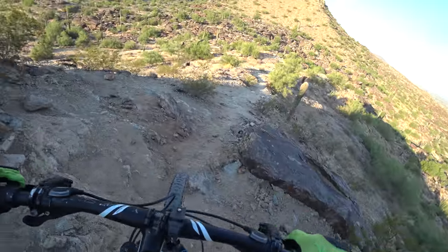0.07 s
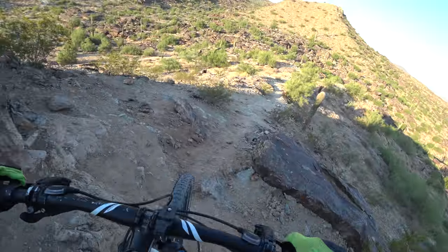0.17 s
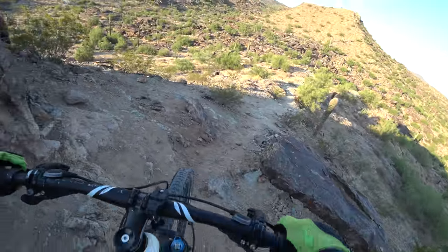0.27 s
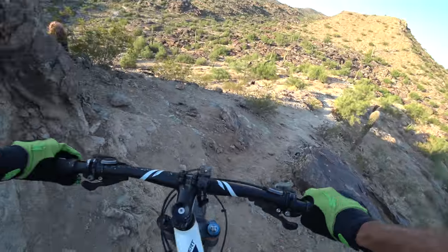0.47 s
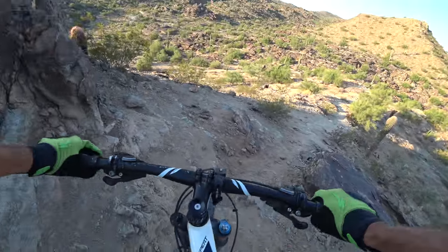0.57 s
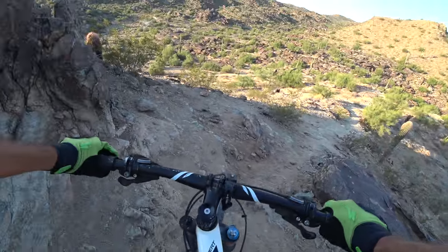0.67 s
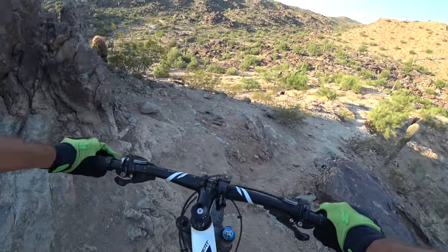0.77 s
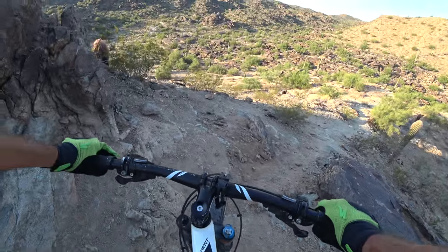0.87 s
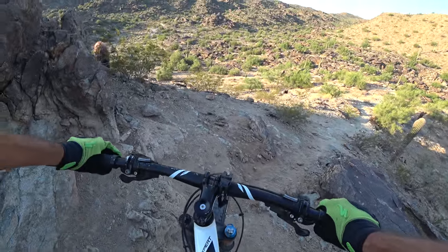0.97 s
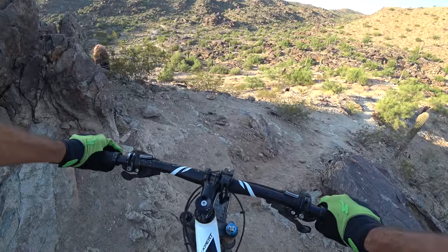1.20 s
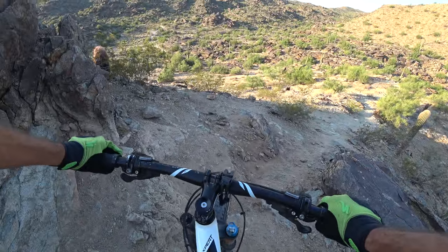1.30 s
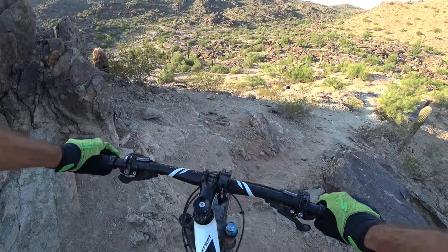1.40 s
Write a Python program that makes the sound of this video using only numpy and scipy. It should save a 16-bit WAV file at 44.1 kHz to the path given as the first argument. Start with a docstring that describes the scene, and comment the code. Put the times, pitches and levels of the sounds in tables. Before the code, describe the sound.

A mountain bike rolls slowly over crunching grit and snapping stones, heard close from the rider's chest. At about 0.2 seconds a tyre thumps onto rock and buzzes briefly. More knocks come around 0.6 seconds. From 0.7 seconds the freehub ratchets with metallic clicks, slowing and fading until about 1.4 seconds, while a hollow tyre drone and low wind rumble die down.

```python
"""Grit crunches and stones snap under a mountain bike rolling slowly down a rocky trail.
Heard from the rider's chest, a tyre lands on rock and booms, its knobs buzz, the frame knocks
and the chain ticks. Then the rider coasts: the freehub's pawls ratchet ever more slowly,
ringing hub and wheel, while the hollow drone of the tyres and the wind's rumble die down."""
import sys
import numpy as np
from scipy import signal
from scipy.fft import rfft, irfft, next_fast_len
from scipy.io import wavfile

SR = 44100
rng = np.random.default_rng(int(sys.argv[2]) if len(sys.argv) > 2 else 0)


def waveform_to_disk(signal):
    """Save audio, clipped to [-1, 1], as 16-bit WAV at the path in sys.argv[1]."""
    frames = np.transpose(np.atleast_2d(signal))
    scaled = np.clip(frames, -1, 1) * 32767
    samples = np.round(scaled).astype(np.int16)
    wavfile.write(sys.argv[1], SR, samples)


N = 63945


def amp(db):
    """Decibels to gain."""
    return 10 ** (np.asarray(db) / 20)


def unit(x):
    """Scale to rms 1."""
    return x / np.sqrt(np.mean(x ** 2) + 1e-20)


def eq(points):
    """An EQ curve, gain against frequency, through (frequency [Hz], level [dB]) points."""
    freqs, db = np.transpose(points)
    return lambda hz: amp(np.interp(np.log(hz + 1), np.log(freqs + 1), db))


def curve(rows):
    """One value per sample from (time [s], value) breakpoints."""
    return np.interp(np.arange(N) / SR, *np.transpose(rows))


def filtered(x, response):
    """Shape the spectrum of x with a gain that depends on frequency."""
    n = x.shape[-1]
    size = next_fast_len(2 * n)
    return irfft(rfft(x, size) * response(np.fft.rfftfreq(size, 1 / SR)), size)[..., :n]


def noise(response, side_db, size=N):
    """Coloured stereo noise of rms 1; side_db sets its width."""
    mid, side = filtered(rng.standard_normal((2, size)), response)
    return unit(np.array([mid + amp(side_db) * side, mid - amp(side_db) * side]))


def fade(t, t60):
    """Exponential decay, 60 dB down after t60 seconds."""
    return np.exp(-np.log(1000) * t / t60)


def strike(t, attack_s, t60):
    """A percussive envelope: fast rise, exponential tail."""
    return (1 - np.exp(-t / attack_s)) * fade(t, t60)


def add(track, start, sound):
    """Mix a sound in at start seconds."""
    part = track[:, max(round(start * SR), 0):][:, :sound.shape[-1]]
    part += sound[..., :part.shape[-1]]


def impacts(rows, skirt, tone_share, side_db, attack_s):
    """Each contact is a damped resonance inside a noise burst; a higher skirt steepens the band."""
    out, t = np.zeros((2, N)), np.arange(SR // 5) / SR
    for start, db, pitch, t60, width in rows:
        peak = lambda hz: (1 + (np.log2((hz + 1) / pitch) / width) ** 2) ** (-skirt / 4)
        band = lambda hz: peak(hz) / (1 + (hz / pitch / 5) ** 2)
        envelope = strike(t, attack_s, t60)
        burst = unit(noise(band, side_db, size=len(t)) * envelope)
        ring = unit(np.sin(2 * np.pi * pitch * t) * envelope)
        gain = amp(db) * np.sqrt(2 * np.mean(fade(t, t60) ** 2))
        add(out, start, gain * (np.sqrt(1 - tone_share) * burst + np.sqrt(tone_share) * ring))
    return out


def tyre_boom():
    """Landing on rock rings the low modes of tyre and wheel."""
    # tyre touchdowns (time [s], level [dB])
    landings = [(0.2243, -30), (0.2444, -21)]
    # wheel modes (frequency [Hz], relative level [dB], t60 [s])
    modes = [(200, 1, 0.16), (332.6, -8.5, 0.27), (457, -11.5, 0.14), (580, -21, 0.54), (738, -20, 0.27),
             (1104, -20.5, 0.36), (1137, -22, 0.37), (2037, -23.5, 0.48)]
    out, t = np.zeros((2, N)), np.arange(SR // 2) / SR
    boom = sum(amp(db) * np.sin(2 * np.pi * hz * t) * fade(t, t60) for hz, db, t60 in modes)
    for start, db in landings:
        add(out, start, amp(db) * boom)
    return out


def tread_buzz():
    """The knobs of the hard-pressed tyre drum on rock, falling in pitch as it slows."""
    # pitch dive (time [s], knob rate [1/s])
    knob_rate = [(.22, 166), (.245, 149), (.27, 138), (.305, 136.5), (.325, 121.5), (.345, 103), (.36, 82)]
    # buzz envelope (time [s], level [dB])
    levels = [(.205, -53.5), (.228, -30.5), (.25, -21.5), (.275, -26.5), (.305, -27.5), (.335, -34.5),
              (.365, -59), (.38, -90)]
    # buzz harmonics (multiple of the knob rate, relative level [dB])
    harmonics = [(1, 1.5), (2, -3.5), (3, -18), (4, -34), (5, -17)]
    phase = 2 * np.pi * np.cumsum(curve(knob_rate)) / SR
    return amp(curve(levels)) * unit(sum(amp(db) * np.sin(k * phase) for k, db in harmonics))


def frame_knocks():
    """Blows thud through frame and suspension, their top end cushioned by rubber."""
    # blows before cushioning (time [s], level [dB], pitch [Hz], t60 [s])
    blows = [(.159, -42.5, 819, 0.29), (.203, -33, 356, 0.14), (.212, -25.5, 370, 0.083),
             (.229, -22, 226, 0.081), (0.2449, -21, 256, 0.056), (0.35, -34.5, 426, 0.031),
             (.478, -46, 244.6, 0.22), (.621, -32, 348, 0.026), (.627, -25.5, 312, 0.076),
             (.631, -34, 169, 0.08), (.66, -31.5, 421, 0.09), (.669, -37, 165, 0.19),
             (0.673, -33.5, 371, 0.13), (1.2566, -35.5, 403, 0.056), (1.336, -42, 414, 0.093)]
    width_octaves, cushion_hz = 0.66, 756
    rows = [(*blow, width_octaves) for blow in blows]
    knocks = impacts(rows, skirt=3.93, tone_share=0.19, side_db=-45, attack_s=0.00044)
    return signal.sosfilt(signal.butter(2, cushion_hz, fs=SR, output="sos"), knocks)


def stone_snaps():
    """Stones snap and scrape under the tyres and against the bike."""
    # stone hits (time [s], level [dB], pitch [Hz], t60 [s], width [octaves])
    stones = [(.034, -42.5, 3320, 0.0097, .7), (.047, -53, 6060, 0.008, 0.43),
              (.056, -44, 2400, .012, 0.55), (.0802, -41.5, 4860, 0.016, .8),
              (.109, -36, 2050, 0.0055, 0.88), (.204, -34, 1115, 0.071, 0.23),
              (.207, -43.5, 6000, 0.14, .8), (.24, -42.5, 6000, 0.055, 0.67),
              (.2145, -32.5, 2110, .025, 0.44), (.2445, -29, 2200, 0.019, 1), (.3508, -20, 1470, 0.013, .4),
              (.415, -26.5, 1796, 0.0091, 0.18), (.464, -42.5, 6860, .06, .6),
              (.477, -33, 2150, 0.018, 0.53), (.515, -33.5, 2410, .012, 0.66),
              (.5315, -30.5, 2500, 0.011, 0.54), (.5317, -34.5, 4010, 0.011, 0.35),
              (.556, -40.5, 4130, 0.0049, .9), (.585, -43.5, 4900, 0.11, 0.08),
              (.589, -41, 1720, 0.037, 0.23), (.605, -38.5, 4220, 0.054, 0.092),
              (.6155, -29, 1710, 0.019, 0.48), (.6165, -27.5, 4370, 0.016, 0.67),
              (.6305, -37.5, 1010, 0.046, .4), (.6603, -28.5, 1220, 0.024, 0.083),
              (.6683, -22.5, 2410, 0.0051, 0.69), (1.168, -46, 1600, 0.048, 0.22)]
    return impacts(stones, skirt=3.27, tone_share=0.24, side_db=-14, attack_s=0.00018)


def freehub():
    """The pawls drop off each tooth one just after another and ring the hub and wheel."""
    # ratchet clicks (time [s], level [dB], spread of the pawl drops [s], tilt [dB/octave])
    clicks = [(0.677, -30, 0.0044, 2), (0.7075, -30, 0.0046, 2.5), (0.738, -31, 0.0063, 0),
              (0.7736, -31, .005, 2), (.808, -33, 0.0095, 3), (0.8434, -35, 0.0075, -0.5),
              (0.8811, -35, 0.0046, -1), (0.9196, -35.5, 0.0061, -1.5), (0.959, -35.5, 0.0097, -0.5),
              (1.0011, -37.5, 0.0087, -1), (1.045, -37, 0.0027, -.5), (1.0897, -36.5, 0.0049, -1),
              (1.1373, -38, 0.0057, 0), (1.1869, -39, 0.0058, 1), (1.241, -36, 0.013, 0),
              (1.293, -42.5, 0.00067, 2), (1.338, -51, 0.0027, -4.5), (1.358, -53.5, 0.0075, -2),
              (1.3986, -50, 0.0034, -5)]
    # colour of the metal clash (frequency [Hz], level [dB])
    colour = [(700, -16), (1400, -15.5), (1700, 4), (2100, -4.5), (2800, -0.5), (3650, -4), (4700, -1.5),
              (5900, -7), (6400, -4.5), (8100, -10), (9100, -6), (10900, -4.5), (12400, -14), (15500, -17),
              (16000, -28)]
    # hub and wheel modes (frequency [Hz], relative level [dB])
    modes = [(1650, 0), (1745, 6), (1835, 1), (2355, 7.5), (2650, 5), (2860, 2), (3040, -6), (3255, 5),
             (4070, 7), (4180, -1), (4470, 0), (4780, 2), (4970, 2.5), (5300, 4.5), (5860, -13), (6265, 5),
             (6370, -3), (7115, 5), (7370, 3), (9020, -11), (10090, 4), (10650, -19), (10930, -1),
             (11050, 7)]
    pawls, attack_s, body_t60, crack_t60 = 6, 0.00038, 0.051, 0.013
    ring_db, scatter_db = -5, 3.5
    out, t = np.zeros((2, N)), np.arange(SR // 4) / SR
    hz, mode_db = np.transpose(modes)
    mode_t60 = 0.15 * (hz[0] / hz) ** 0.42  # high modes die sooner
    for start, db, spread, tilt_db in clicks:
        drops = spread * (np.arange(pawls) + rng.random(pawls) - 1 / 2) / pawls
        age = np.maximum(t - drops[:, None], 0)
        onset = 1 - np.exp(-age / attack_s)
        swell = lambda t60: np.sqrt(np.mean((onset * fade(age, t60)) ** 2, axis=0))
        tilt = lambda f: amp(tilt_db * np.log2((f + 1) / 5000))
        clash = noise(lambda f: eq(colour)(f) * tilt(f), side_db=-10, size=len(t))
        clash *= swell(body_t60) + swell(crack_t60)
        phase = rng.uniform(0, 2 * np.pi, (len(hz), 1))
        phase = phase + rng.normal(0, 0.29, (2, len(hz), 1))  # left-right offsets add width
        gains = (tilt(hz) * amp(mode_db + rng.normal(0, scatter_db, len(hz))))[:, None]
        partials = gains * np.sin(2 * np.pi * hz[:, None] * t + phase) * fade(t, mode_t60[:, None])
        ring = partials.sum(axis=1) * onset.mean(axis=0) / np.sqrt(np.sum(gains ** 2) / 2)
        add(out, start, amp(db) * (clash + amp(ring_db) * ring))
    return out


def chain_ticks():
    """Chain and pawls give short, bright metal ticks."""
    # drivetrain ticks (time [s], relative level [dB])
    ticks = [(0.1204, -31), (.1402, -27.5), (.1533, -29.5), (0.167, -33), (.33, -29), (1.2917, -29.5)]
    # metal resonances (frequency [Hz], width [Hz], relative level [dB])
    peaks = [(3550, 630, 5.5), (3930, 250, 3), (6370, 700, -0.5), (8100, 350, 2.5), (9000, 1200, -2),
             (11600, 700, -7), (14200, 600, -14)]
    out, t = np.zeros((2, N)), np.arange(SR // 20) / SR
    body = lambda f: np.sqrt(sum(amp(db) ** 2 / (1 + ((f - hz) / width) ** 2) ** 2
                                 for hz, width, db in peaks))
    envelope = strike(t, attack_s=0.00045, t60=0.008)
    for start, db in ticks:
        add(out, start, amp(db + 5) * noise(body, side_db=-14, size=len(t)) * envelope)
    return out


def grit_crunch():
    """Crushed grains crackle over the hiss of rolling rubber."""
    # crunch envelope (time [s], level [dB])
    levels = [(0, -50.5), (.05, -42.5), (.135, -49), (.175, -39.5), (.199, -49), (.206, -36), (.25, -34.5),
              (.305, -43.5), (.365, -37.5), (.405, -43.5), (.475, -41.5), (.505, -45), (.55, -45.5),
              (.61, -36.5), (.65, -41.5), (.73, -42.5), (.82, -51), (1.17, -50), (1.23, -61.5),
              (1.45, -59.5)]
    # colour of the grit (frequency [Hz], level [dB])
    colour = [(100, 1), (300, -3), (600, 3), (900, -0.5), (1400, -2), (2100, 0.5), (3000, -6.5),
              (4500, -8.5), (8000, -12.5), (11500, -20.5), (16000, -28)]
    grains_per_s, grain_s, side_db = 1000, 0.00063, -8.5
    triggers = (rng.random(N) < grains_per_s / SR) * np.exp(0.3 * rng.standard_normal(N))
    grains = signal.lfilter([1], [1, -np.exp(-1 / (grain_s * SR))], triggers)
    crackle = unit(filtered(grains * noise(np.ones_like, side_db), eq(colour)))
    hiss = noise(eq(colour), side_db)
    return amp(curve(levels)) * unit(hiss + crackle)


def suspension_jolts():
    """Each bump gives one soft, deep push."""
    # bumps (centre time [s], level [dB], pitch [Hz])
    bumps = [(0.071, -40.5, 49.7), (0.157, -54, 61), (.36, -42, 49), (0.516, -30.5, 52)]
    t, width_s = np.arange(N) / SR, 0.013
    return sum(amp(db) * np.cos(2 * np.pi * hz * (t - at)) * np.exp(-((t - at) / width_s) ** 2 / 2)
               for at, db, hz in bumps)


def rolling_drone():
    """Tyres drone hollowly over uneven ground."""
    # drone envelope (time [s], level [dB])
    levels = [(0, -56), (.18, -53.5), (.38, -49), (.56, -49), (.68, -45), (.76, -46), (.86, -52.5),
              (.95, -46.5), (1.08, -52), (1.17, -50.5), (1.23, -55), (1.45, -60.5)]
    # hollow tyre colour (frequency [Hz], level [dB])
    colour = [(60, -4), (95, 1), (125, 8), (190, -4.5), (320, -2.5), (600, -4.5), (850, -19), (1200, -7),
              (1500, -54), (3000, -43)]
    return amp(curve(levels)) * noise(eq(colour), side_db=-41)


def wind():
    """Air rumbles on the microphone and dies down as the bike slows."""
    # wind envelope (time [s], level [dB])
    levels = [(0, -43), (.25, -44.5), (.45, -40.5), (.7, -49.5), (.9, -53), (1.2, -55), (1.3, -55),
              (1.45, -58.5)]
    # colour of the rumble (frequency [Hz], level [dB])
    colour = [(10, -8), (30, -3.5), (52, 0.5), (85, -10.5), (122, -5), (170, -20.5), (500, -40),
              (3000, -73)]
    return amp(curve(levels)) * noise(eq(colour), side_db=-9)


def rock_reflections(hits):
    """The rocks beside the trail throw back a short, weak tail."""
    t, predelay_s, wet_db = np.arange(SR // 4) / SR, 0.004, -16
    tail = rng.standard_normal((2, len(t))) * fade(t, t60=0.05) * (t > predelay_s)
    return amp(wet_db) * signal.fftconvolve(hits, tail / np.linalg.norm(tail[0]), axes=1)[:, :N]


def scene():
    """The whole bike, panned slightly left, over a bed of wind."""
    hits = stone_snaps() + frame_knocks() + chain_ticks() + freehub()
    wheels = tyre_boom() + tread_buzz() + suspension_jolts() + grit_crunch() + rolling_drone()
    pan = amp([[0.35], [-0.35]])
    return (hits + rock_reflections(hits) + wheels) * pan + wind()


def record(dry):
    """A brick-wall low-pass takes off the very top."""
    return filtered(dry, lambda hz: hz < 15900)


dry = scene()
out = record(dry)
waveform_to_disk(out)
```